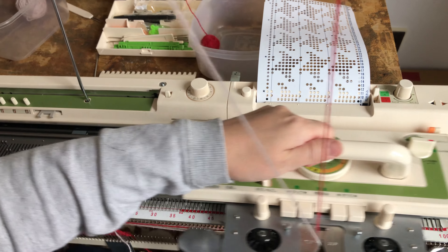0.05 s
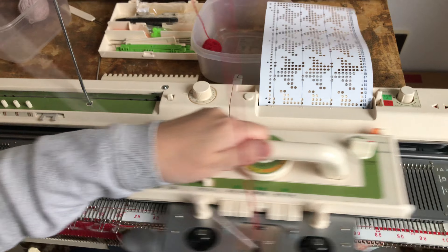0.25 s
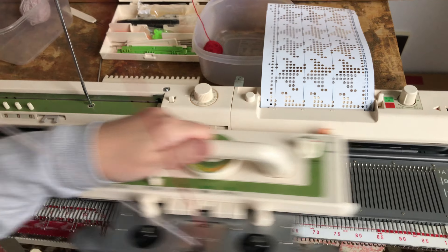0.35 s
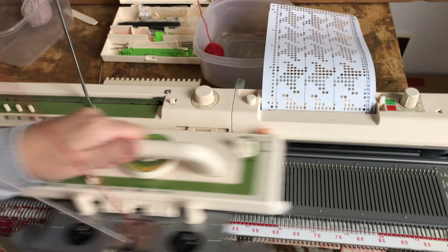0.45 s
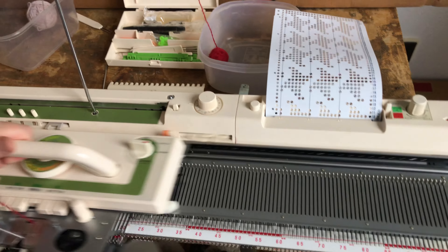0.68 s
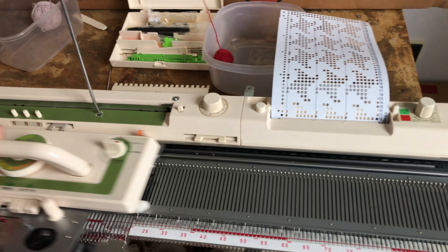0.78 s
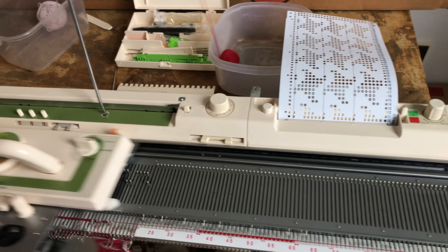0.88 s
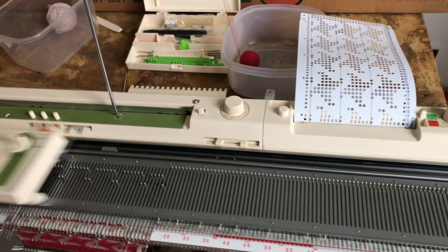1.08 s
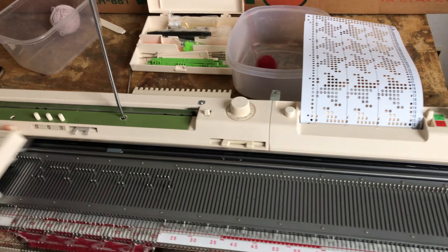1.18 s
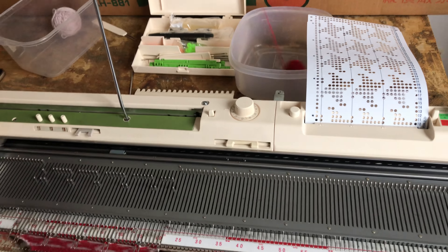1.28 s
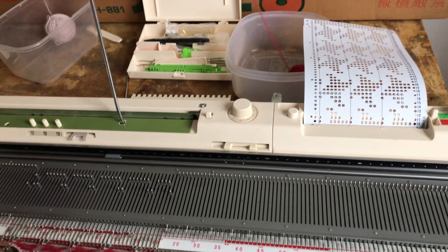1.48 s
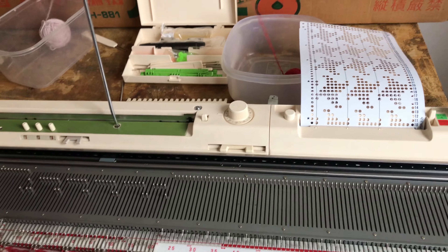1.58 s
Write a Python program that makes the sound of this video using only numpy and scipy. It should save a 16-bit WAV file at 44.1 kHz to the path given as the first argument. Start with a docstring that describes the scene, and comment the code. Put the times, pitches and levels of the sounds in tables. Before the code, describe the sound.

A knitting machine carriage is pushed once along its steel needle bed, close by in a small room. A few clicks lead into a gritty, ticking rattle over a low table rumble, then sharp snaps and faint clicks.

```python
"""A knitting machine carriage is pushed once along its steel needle bed, close by in a small room.
Needle butts tick against the cams over a gritty scrape; groups of needles clatter near both ends
of the stroke, and single ones ping. The casing rings and knocks, and the table rumbles and hums.
Cams and levers snap over, thin springs sing faintly, and latches click as the carriage comes to rest."""
import sys
import numpy as np
from scipy import signal
from scipy.fft import rfft, irfft
from scipy.io import wavfile
from scipy.ndimage import uniform_filter1d

SR = 44100
rng = np.random.default_rng(int(sys.argv[2]) if len(sys.argv) > 2 else 0)


def unload_wav(signal):
    """Save mono or channel-first audio to the path in sys.argv[1] as 16-bit WAV at rate SR, clipped to [-1, 1]."""
    wavfile.write(
        sys.argv[1],
        SR,
        np.round(np.clip(np.atleast_2d(signal).T, -1, 1) * 32767).astype(np.int16),
    )


N = 72765
T = np.arange(N) / SR

# Background air. Each row: frequency in Hz, relative level in dB.
AIR_SPECTRUM = [(25, -35), (48, -2), (130, -14), (400, -8.5), (1000, -19), (16000, -38.5)]
# Machine on its table. Each row: mode frequency in Hz, relative level in dB.
TABLE_MODES = [(52, -7), (136, 1), (172, -2), (222, -1)]
# Table rumble. Each row: time in seconds, level in dB.
RUMBLE_LEVELS = [(.12, -59.5), (.26, -49), (.55, -40.5), (1.5, -47), (1.53, -56.5)]
# Swelling table modes. Each row: peak time in seconds, frequency in Hz, level in dB.
HUMS = [(.17, 222, -50), (.54, 172, -40), (.68, 136, -37), (.88, 172, -41), (.99, 222, -37.5),
        (1.11, 136, -40), (1.28, 136, -43), (1.345, 222, -44)]
# Casing impact response. Each row: frequency in Hz, relative level in dB.
CASING_SPECTRUM = [(130, -17), (280, -3), (420, -7.5), (600, -0.5), (1250, -2), (1800, -1), (8000, -46)]
# Casing resonances. Each row: frequency in Hz, relative level in dB.
CASING_MODES = [(560, -5), (626, -2), (690, -4), (781, -4), (914, -4), (1012, -2), (1120, 0), (1228, 2)]
# Carriage rocking on its rail. Each row: start in seconds, relative level in dB.
KNOCKS = [(0.558, -26.5), (0.644, -28.5), (.759, -23.5)]
# Steel bed impact response. Each row: frequency in Hz, relative level in dB.
BED_SPECTRUM = [(300, -41.5), (900, -11.5), (1600, 0), (2800, 1.5), (4200, 0.5), (4950, -3), (5600, 0.5),
                (7600, -0.5), (9300, 2), (10400, -3), (11600, 2), (14200, 2), (16000, -4)]
# Thin steel springs. Each row: start in seconds, frequency in Hz, level in dB.
SPRINGS = [(.035, 4091, -59), (1.478, 4370, -60)]
# Needle latches dropping shut. Each row: start in seconds, relative level in dB.
LATCHES = [(1.487, -39.5), (1.5733, -43.5), (1.618, -61)]
# Latch resonances. Each row: frequency in Hz, relative level in dB.
LATCH_MODES = [(2950, -9), (5335, 0), (8600, -3)]
# Cam and lever snaps. Each row: start in seconds, level in dB, lower and upper band edge in Hz.
CLICKS = [(0.114, -44.5, 600, 5000), (0.138, -45, 4500, 9500), (0.2987, -27, 1000, 5200),
          (0.355, -38, 5006, 9000), (0.3669, -29.5, 3720, 6600), (0.4267, -19, 3470, 13000),
          (1.026, -18, 4000, 15000), (1.093, -17, 4000, 15000), (1.152, -26, 9000, 15000)]
# Single needles ringing. Each row: start in seconds, frequency in Hz, level in dB.
PINGS = [(.117, 3200, -51), (.61, 3540, -28), (.93, 3618, -26), (1.178, 6450, -30), (1.228, 3300, -31)]
# Needle groups hitting a cam. Each row: start in seconds, force level in dB, length in seconds.
CLATTERS = [(.173, -37.5, 0.024), (0.209, -36, 0.024), (0.2318, -25, 0.016), (0.252, -28, 0.018),
            (0.396, -23.5, 0.017), (0.442, -28, 0.0087), (0.978, -26, 0.018), (1.054, -24.5, 0.012),
            (1.095, -27, 0.012), (1.116, -21.5, 0.023), (1.1508, -17, 0.01), (1.169, -21.5, 0.012),
            (1.219, -23.5, 0.016), (1.269, -24.5, 0.02), (1.325, -33.5, 0.017), (1.357, -34.5, 0.028)]
# Carriage travel. Each row: time in seconds, speed in m/s.
CARRIAGE_SPEED = [(0, 0.031), (.2, 0.17), (.5, 0.82), (.95, 0.83), (1.55, 0.041)]
# Sliding force. Each row: time in seconds, level at the needles in dB, level at the casing in dB.
STROKE_LEVELS = [(0, -50.5, -65.5), (.085, -65.5, -66.5), (.165, -49, -52), (.25, -35.5, -36.5),
                 (.29, -40, -43), (.38, -40, -41.5), (.44, -28, -35.5), (.55, -23.5, -32),
                 (.63, -23, -32.5), (.68, -28, -35.5), (.79, -26, -34.5), (.845, -29, -38.5),
                 (.88, -26.5, -38), (.99, -26.5, -37), (1.27, -32, -37), (1.31, -38, -41),
                 (1.385, -37.5, -42.5), (1.41, -44.5, -49.5), (1.495, -53, -58.5), (1.53, -72, -66)]
# Needle and bed resonances. Each row: frequency in Hz, relative level in dB.
NEEDLE_MODES = [(2881, -11), (3530, -3), (3630, -1.5), (4244, -8), (5400, -8), (6195, -7), (6420, -5),
                (8450, -5), (9450, -4), (11572, -4)]

CAM_COUNT, NEEDLE_PITCH_M, GRIT_PER_S = 4, .0045, 7000
CASING_T60_S = .07
LOW_CUT_HZ, TOP_HZ = 38, 15750


def amp(db):
    """Decibels to gain."""
    return 10 ** (np.asarray(db) / 20)


def unit(x):
    """Scale to rms 1."""
    return x / np.sqrt(np.mean(x ** 2))


def running_rms(x, window_s):
    """Short-term level."""
    return np.sqrt(np.abs(uniform_filter1d(x ** 2, int(window_s * SR))) + 1e-12)


def steady(x):
    """Hold the short-term rms at 1."""
    return x / running_rms(x, window_s=.07)


def curve(rows, column=1):
    """One table column, interpolated over time."""
    rows = np.array(rows)
    return np.interp(T, rows[:, 0], rows[:, column])


def fade(t60_s):
    """Exponential decay, 60 dB down at t60_s."""
    return np.exp(-np.log(1000) * T / t60_s)


def pulse(start_s, fall_s):
    """Instant rise, exponential fall."""
    return (T >= start_s) * np.exp(-np.abs(T - start_s) / fall_s)


def tone(start_s, hz, t60_s):
    """One struck mode."""
    age_s = np.maximum(T - start_s, 0)
    return np.sin(2 * np.pi * hz * age_s) * np.exp(-np.log(1000) * age_s / t60_s)


def butter(order, hz, kind="low"):
    """Butterworth filter sections."""
    return signal.butter(order, hz, kind, fs=SR, output="sos")


def hiss(low_hz, high_hz, order):
    """Band noise of rms 1."""
    band = butter(order, [low_hz, min(high_hz, TOP_HZ)], "band")
    return unit(signal.sosfilt(band, rng.standard_normal(N)))


def through(x, response):
    """Convolve with a response scaled to unit energy."""
    return signal.fftconvolve(x, response / np.linalg.norm(response))[:N]


def colour(spectrum):
    """Causal response with the given spectrum."""
    hz, db = np.array(spectrum).T
    grid_hz = np.linspace(1, SR / 2, 1025)
    gain = amp(np.interp(np.log(grid_hz), np.log(hz), db))
    cepstrum = irfft(np.log(gain))
    half = len(cepstrum) // 2
    return irfft(np.exp(rfft(2 * cepstrum[:half], 2 * half)))


def ring(force, modes, t60_s, swell_db, step_s=.035):
    """Separately driven modes swell and fade at random as the contact point travels."""
    out, power = 0, 0
    steps_s = np.arange(0, T[-1] + step_s, step_s)
    for hz, db in modes:
        drift = np.clip(rng.standard_normal(len(steps_s)), -2, 2)
        coupling = unit(amp(swell_db * np.interp(T, steps_s, drift)))
        drive = force * coupling * rng.choice([-1, 1], N)
        out += amp(db) * through(drive, fade(t60_s) * np.cos(2 * np.pi * hz * T))
        power += amp(db) ** 2
    return out / np.sqrt(power)


def room(x):
    """Add a short dull reverberation and quiet air."""
    tail = signal.sosfilt(butter(1, hz=4000), rng.standard_normal(N)) * fade(t60_s=.22)
    air = unit(through(rng.standard_normal(N), colour(AIR_SPECTRUM)))
    return x + amp(-19) * through(x, tail) + amp(-58.5) * air


def table(swell_s=.023):
    """The pushed machine rumbles on its table; single modes swell into brief hums."""
    rumble = ring(sliding(), TABLE_MODES, t60_s=.2, swell_db=3)
    rumble = signal.sosfilt(butter(2, hz=413), rumble)
    out = amp(curve(RUMBLE_LEVELS)) * steady(rumble)
    for peak_s, hz, db in HUMS:
        hum = np.sqrt(2) * np.sin(2 * np.pi * (hz * T + rng.random()))
        out += amp(db) * hum / np.cosh((T - peak_s) / swell_s)
    return out


def springs(rise_s=.05, beat_hz=47, t60_s=.8):
    """Thin springs ring in two planes at once, so their tone flutters."""
    out = 0
    for start_s, hz, db in SPRINGS:
        rise = np.clip((T - start_s) / rise_s, 0, 1)
        planes = tone(start_s, hz, t60_s) + .65 * tone(start_s, hz + beat_hz, t60_s)
        out += amp(db) * rise * planes
    return out


def knocks(centre_hz=583):
    """The carriage rocks: soft, heavy blows reach only the two lowest casing modes."""
    push = sum(amp(db) * pulse(start_s, fall_s=.0058) for start_s, db in KNOCKS)
    out = 0
    for hz, db in CASING_MODES[:2]:
        force = push * hiss(centre_hz / np.sqrt(2), centre_hz * np.sqrt(2), order=2)
        out += amp(db) * through(force, tone(0, hz, CASING_T60_S))
    return amp(-14.5) * out


def casing(force):
    """The hollow carriage shell knocks and rings."""
    knock = through(force, colour(CASING_SPECTRUM))
    ringing = ring(force, CASING_MODES, CASING_T60_S, swell_db=3)
    return amp(-1.5) * knock + amp(-3.5) * ringing


def needle_bed(force, wash_db=3):
    """Bright steel: a crack and a short wash of crowded modes, different for every strike."""
    decay = fade(t60_s=.014) ** 2
    energy = np.abs(signal.fftconvolve(force ** 2, decay / decay.sum())[:N])
    wash = amp(wash_db) * np.sqrt(energy) * rng.standard_normal(N)
    return through(force + wash, colour(BED_SPECTRUM)) / np.hypot(1, amp(wash_db))


def latches():
    """A latch drops shut: a tiny crack on the bed, then its own modes ring."""
    envelope = sum(amp(db) * pulse(start_s, fall_s=.0022) for start_s, db in LATCHES)
    ringing = sum(amp(db + mode_db) * tone(start_s, hz, t60_s=.032)
                  for start_s, db in LATCHES for hz, mode_db in LATCH_MODES)
    return needle_bed(envelope * rng.standard_normal(N)) + amp(-6) * ringing


def clicks():
    """Cams and levers snap over: brief contact chatter, each in its own band."""
    return sum(amp(db) * pulse(start_s, fall_s=.004) * hiss(low_hz, high_hz, order=3)
               for start_s, db, low_hz, high_hz in CLICKS)


def pings():
    """Single needles flick free of a cam and ring out."""
    return sum(amp(db) * tone(start_s, hz, t60_s=.1) for start_s, hz, db in PINGS)


def grit(scatter_db=3.5):
    """Dense tiny impacts of steel sliding on steel."""
    hits = (rng.random(N) < GRIT_PER_S / SR) * rng.choice([-1, 1], N)
    return unit(hits * amp(scatter_db * np.minimum(rng.standard_normal(N), 2)))


def clatters(attack_s=.0006, fall_s=.0037):
    """Groups of needles run into a cam: abrupt, dense runs of impacts."""
    envelope = 0
    for start_s, db, length_s in CLATTERS:
        rise = np.clip((T - start_s) / attack_s, 0, 1)
        fall = np.exp(-np.maximum(T - start_s - length_s, 0) / fall_s)
        envelope += amp(db) * rise * fall
    return envelope * grit()


def butts(count=300, jitter_pitches=.16, scatter_db=3.5):
    """Each cam strikes one needle butt per pitch travelled, a little unevenly."""
    travel_pitches = np.cumsum(curve(CARRIAGE_SPEED)) / SR / NEEDLE_PITCH_M
    force = np.zeros(N)
    for cam in range(CAM_COUNT):
        lag, size = rng.standard_normal((count, 2)).T
        butt_pitches = np.arange(count) + rng.random() + jitter_pitches * lag
        hit_samples = np.searchsorted(travel_pitches, butt_pitches)
        inside = (hit_samples > 0) & (hit_samples < N)
        strikes = (-1) ** cam * amp(scatter_db * np.minimum(size, 2))
        np.add.at(force, hit_samples[inside], strikes[inside])
    return steady(force)


def sliding():
    """Contact force of the moving carriage: butt ticks over grit."""
    return amp(-2) * butts() + amp(.5) * grit()


def soften(x, treble_floor=.033, hard_db=-30):
    """Gentle contacts are duller than hard ones: the treble follows the level."""
    low = signal.sosfiltfilt(butter(1, hz=6940), x)
    level = running_rms(x, window_s=.0099)
    hardness = level / (level + amp(hard_db))
    return low + (x - low) * (treble_floor + (1 - treble_floor) * hardness)


def needles(force):
    """Struck needles rattle the bed and ring."""
    rattle = needle_bed(force)
    ringing = ring(force, NEEDLE_MODES, t60_s=.05, swell_db=5)
    return soften(rattle + amp(-12.5) * ringing)


def scene():
    """One carriage stroke, the same in both channels."""
    slide, clatter, click = sliding(), clatters(), clicks()
    rattle = needles(slide * amp(curve(STROKE_LEVELS, column=1)) + clatter)
    small_parts = click + latches() + pings() + springs()
    jolts = clatter + click * rng.choice([-1, 1], N)  # random signs make the clicks broadband
    shell = casing(slide * amp(curve(STROKE_LEVELS, column=2)) + amp(-11.5) * jolts)
    return np.tile(room(rattle + small_parts + shell + knocks() + table()), (2, 1))


def record(dry):
    """Cut the deepest bass and the top."""
    dry = signal.sosfilt(butter(6, LOW_CUT_HZ, "high"), dry)
    return signal.sosfilt(signal.ellip(12, .2, 80, TOP_HZ, fs=SR, output="sos"), dry)


dry = scene()
out = record(dry)
unload_wav(out)
```